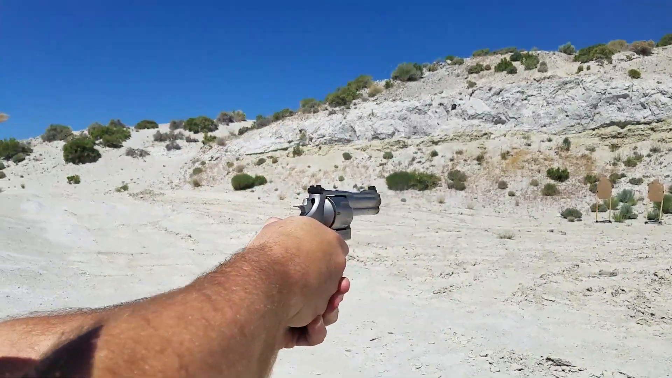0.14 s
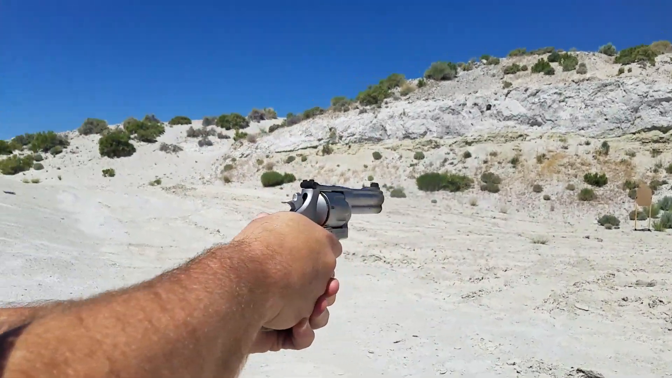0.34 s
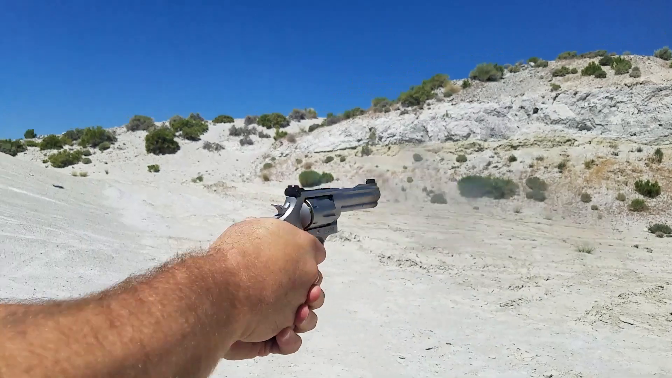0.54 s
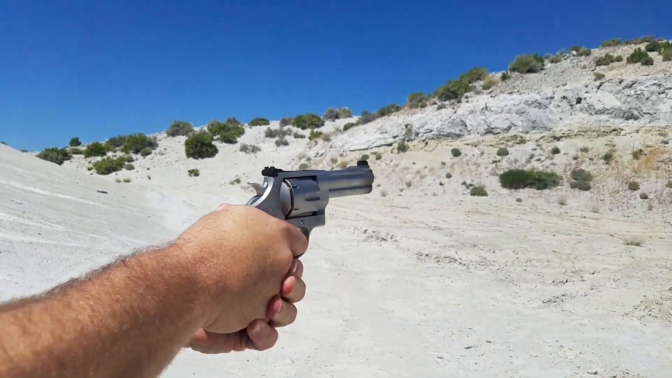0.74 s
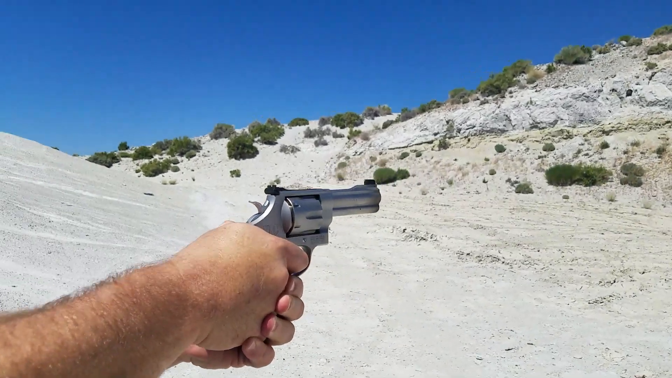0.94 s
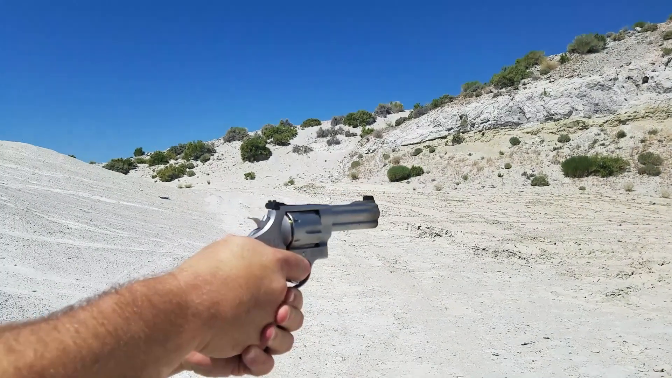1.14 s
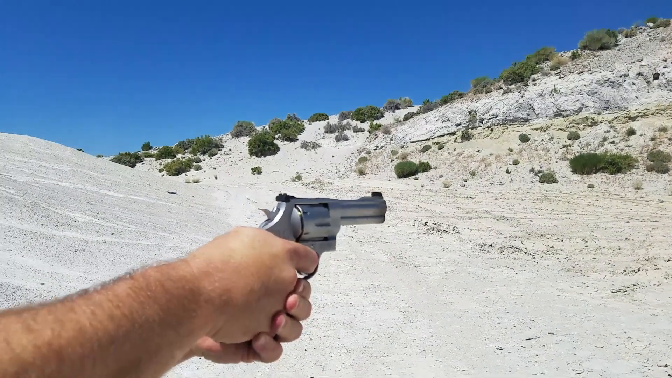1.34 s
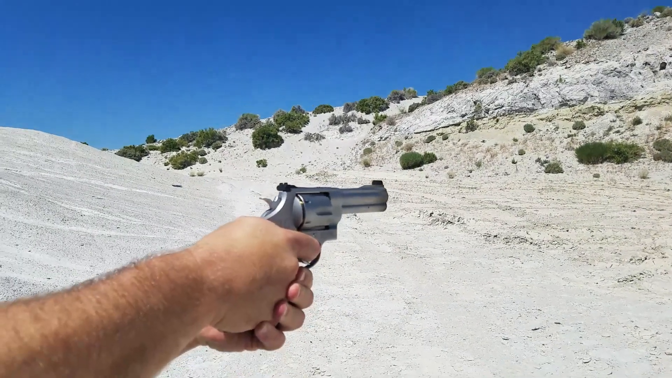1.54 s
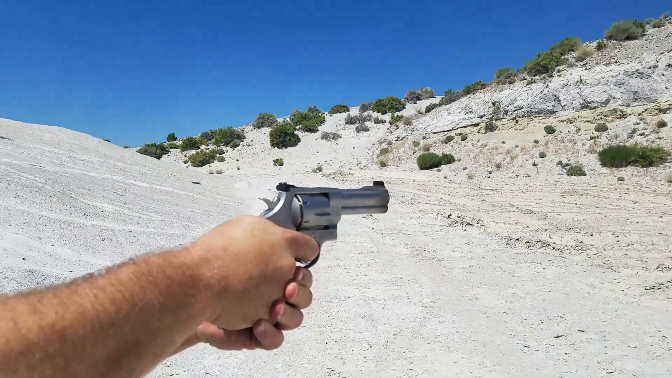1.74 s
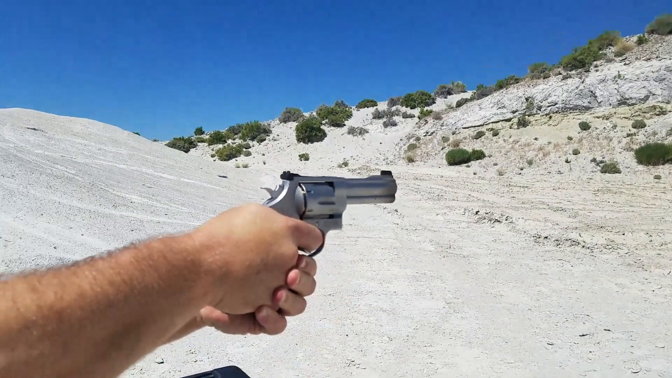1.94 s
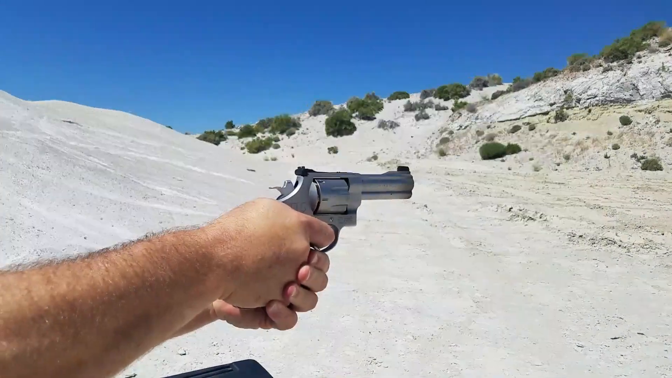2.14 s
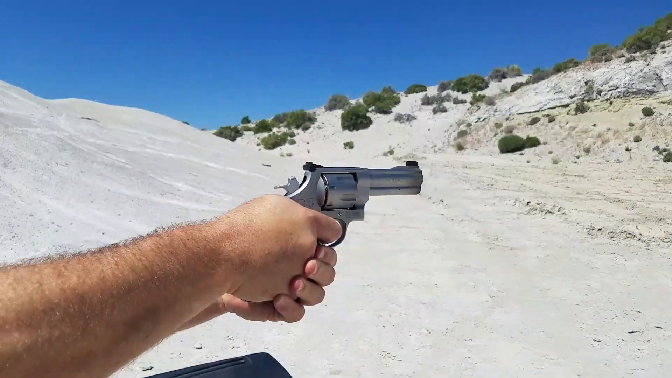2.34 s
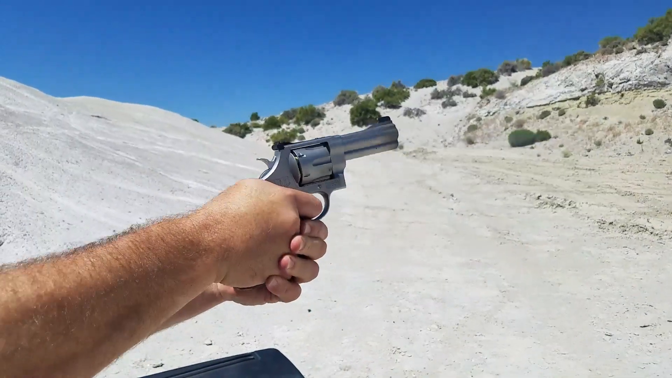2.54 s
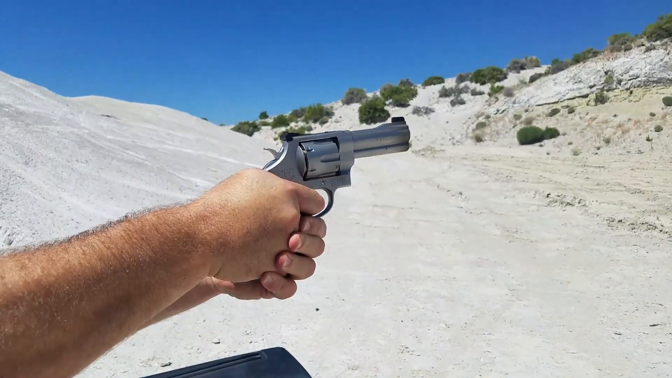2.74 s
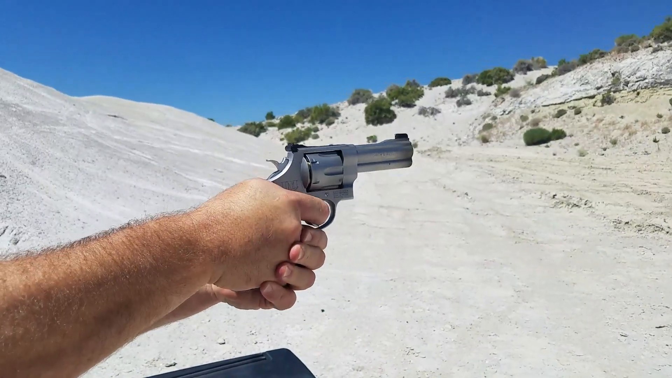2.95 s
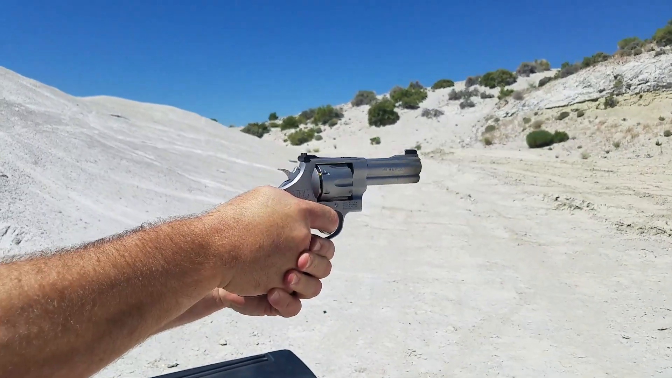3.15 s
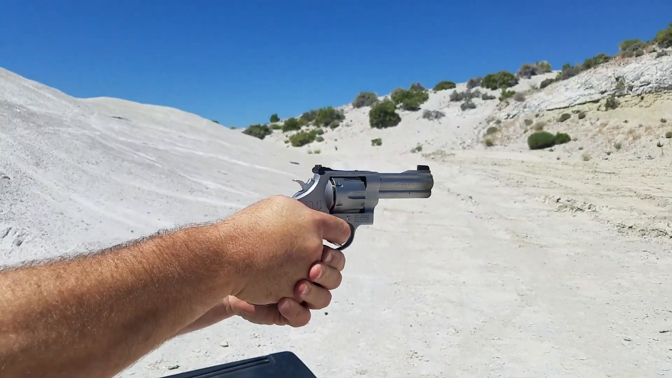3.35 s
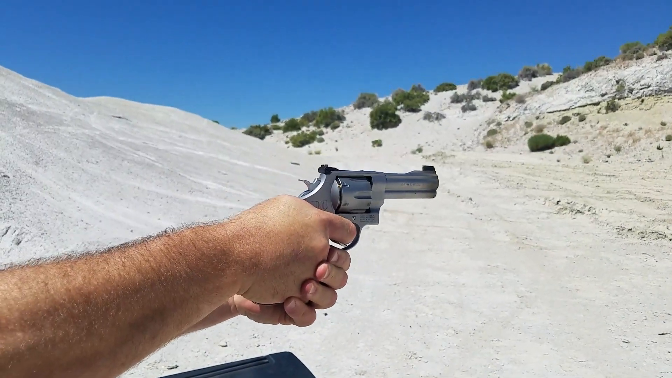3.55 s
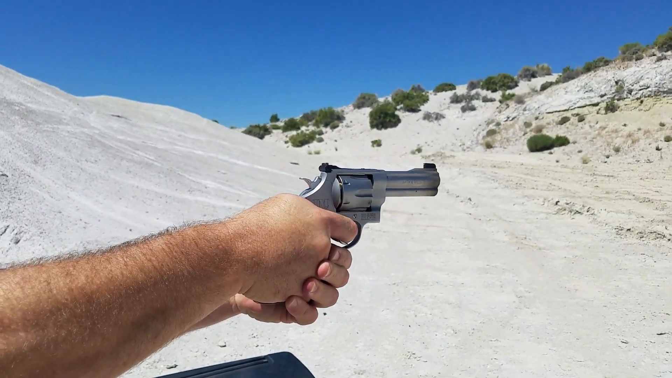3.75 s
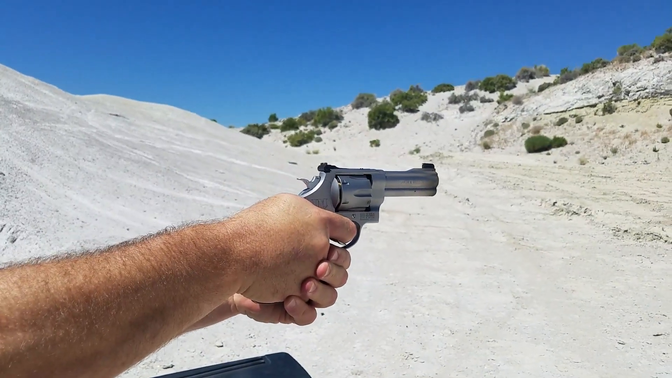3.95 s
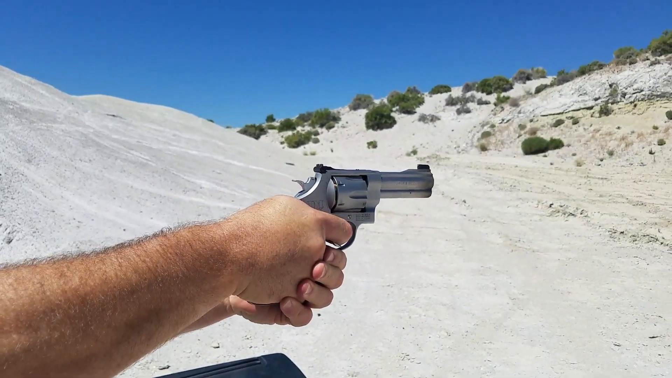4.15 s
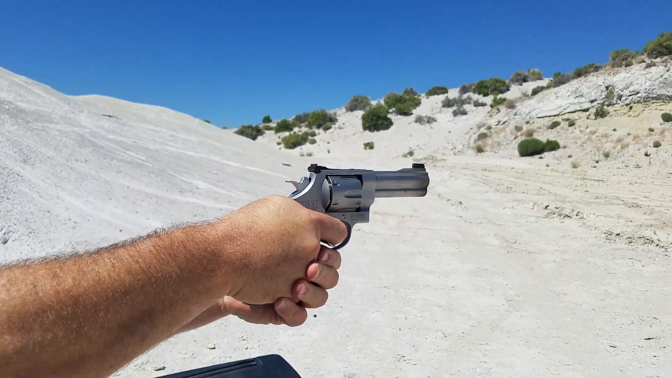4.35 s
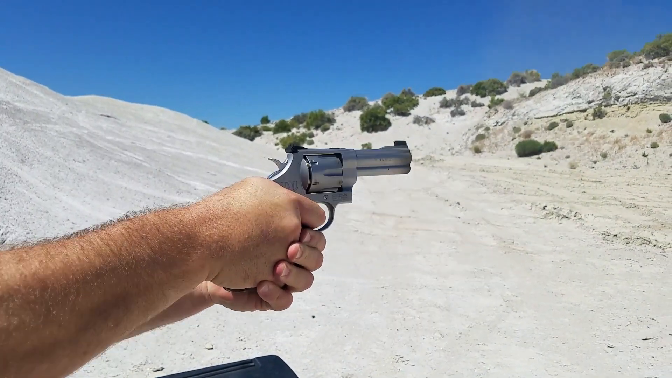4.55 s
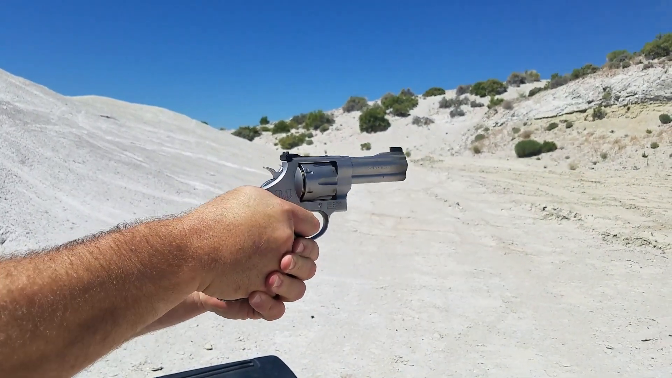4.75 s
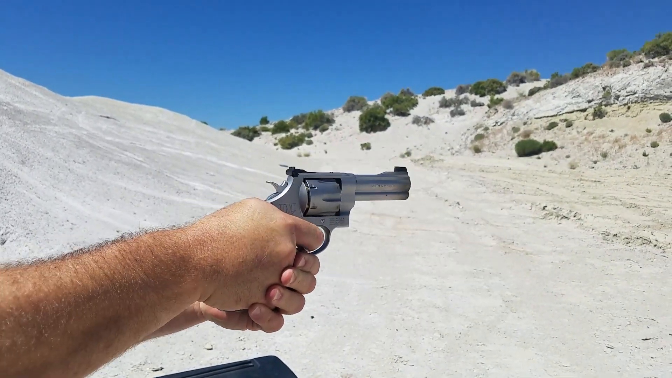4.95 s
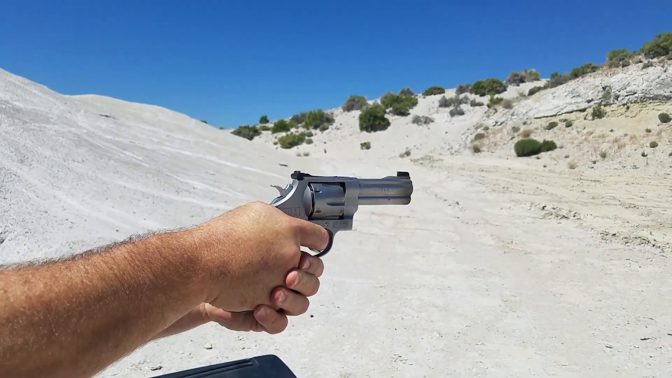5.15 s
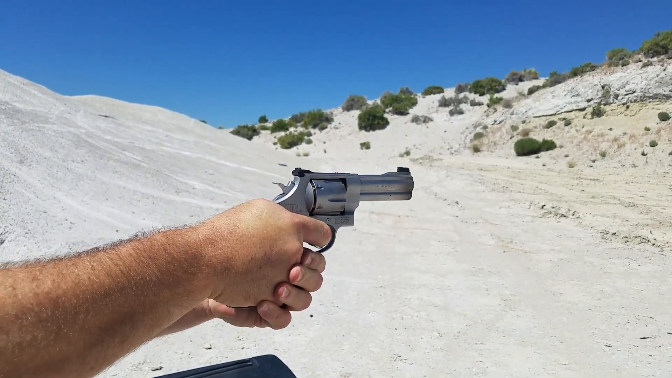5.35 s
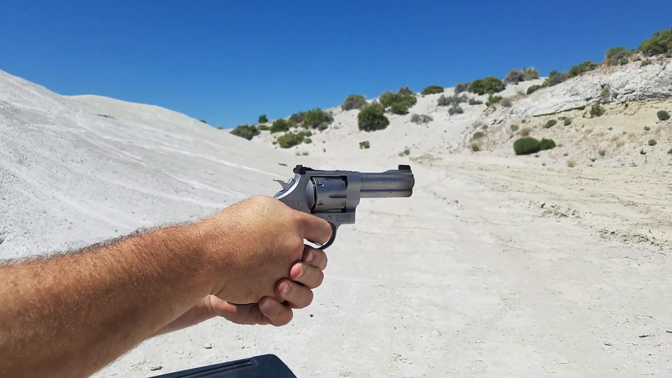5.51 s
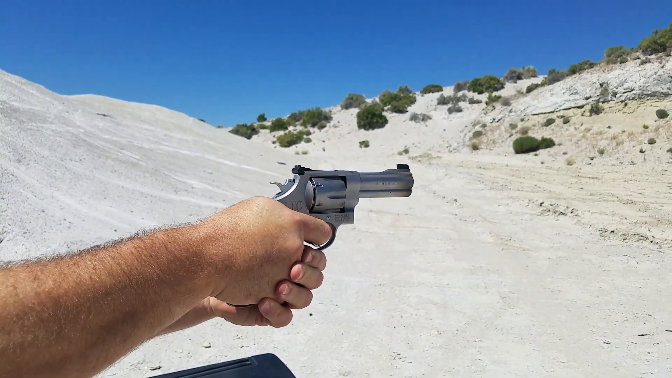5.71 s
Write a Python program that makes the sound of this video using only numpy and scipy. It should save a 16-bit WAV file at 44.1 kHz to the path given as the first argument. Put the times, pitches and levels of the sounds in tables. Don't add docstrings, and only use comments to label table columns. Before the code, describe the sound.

A steel click and lumpy wind open the scene, then a loud revolver shot with a quick double echo and rumbling decay. Two more follow, slowly spaced, the last with the strongest crack. The quiet surroundings sink after each shot and creep back: gusts striking left and right unequally, distant air, very faint pulsing insects, small lock clicks. Close stereo microphone in an open basin.

```python
import sys
import numpy as np
from scipy import signal
from scipy.fft import rfft, irfft, next_fast_len
from scipy.io import wavfile
from scipy.ndimage import uniform_filter1d, map_coordinates

SR = 44100
rng = np.random.default_rng(int(sys.argv[2]) if len(sys.argv) > 2 else 0)


def convert_level_to_amplitude(level_db):
    exponent = np.asarray(level_db, float) / 20
    return 10 ** exponent


def master_out(mix):
    frames = np.transpose(np.atleast_2d(mix))
    ceiling = np.clip(frames, -1, 1)
    pcm = np.round(ceiling * 32767).astype(np.int16)
    wavfile.write(sys.argv[1], SR, pcm)


N = 254898


def unit(x):
    return x / np.sqrt(np.mean(x ** 2) + 1e-20)


def noise(*shape):
    return rng.standard_normal(shape)


def along(points, hz):
    f, v = np.transpose(points)
    return np.interp(np.log(hz + 1), np.log(f + 1), v)


def wobble(knots_per_s):
    knots = noise(int(N * knots_per_s / SR) + 4)
    return map_coordinates(knots, [np.arange(N) * knots_per_s / SR])


def filtered(x, response):
    size = next_fast_len(x.shape[-1] + 4096)
    gain = response(np.fft.rfftfreq(size, 1 / SR))
    gain = gain / np.sqrt(np.mean(abs(gain) ** 2))
    return irfft(rfft(x, size) * gain, size)[..., :x.shape[-1]]


def coloured(x, spectrum):
    points = [(1, -120)] + spectrum + [(SR, -90)]
    return filtered(x, lambda hz: convert_level_to_amplitude(along(points, hz)))


def resonances(modes):
    def response(f):
        total = 0
        for k, (centre, width, db) in enumerate(modes):
            damping = 1j * f * width
            total = total + (-1) ** k * convert_level_to_amplitude(db) * damping / (centre * centre - f * f + damping)
        return total
    return response


def swell(t, rise_s, t60_s):
    t = np.maximum(t, 0)
    return (1 - np.exp(-t / rise_s)) * convert_level_to_amplitude(-60 * t / t60_s)


def pan(db):
    return db * np.array([[.5], [-.5]])


def add(out, sound, s):
    part = out[:, round(s * SR):][:, :sound.shape[1]]
    part += sound[:, :part.shape[1]]


# (frequency [Hz], left-right likeness [0-1])
PORT_LIKENESS = [(60, 0.24), (130, .94), (380, .92), (700, 0.25), (1200, 0.97), (2400, 0.63), (6000, .5),
                 (15000, .55)]
# (frequency [Hz], left lead [rad])
PORT_LEAD = [(20, 0), (300, -0.5), (600, -0.46), (1400, -2), (2400, -1.5), (4000, -1.8), (15000, -1.5)]
# (frequency [Hz], left minus right [dB])
PORT_LEAN = [(60, -1.0), (180, -2.5), (550, -1), (1650, -2), (4970, -3.5), (15000, 1.5)]


def ports(pair):
    size = pair.shape[1] + 512
    hz = np.fft.rfftfreq(size, 1 / SR)
    turn = np.arccos(np.clip(along(PORT_LIKENESS, hz), 0, 1)) / 2
    mid, side = rfft(pair, size) * [np.cos(turn), np.sin(turn)]
    skew = convert_level_to_amplitude(along(PORT_LEAN, hz) / 2) * np.exp(.5j * along(PORT_LEAD, hz))
    return irfft([(mid + side) * skew, (mid - side) / skew], size)[:, :pair.shape[1]]


# (loud body onset [s], muzzle crack [dB], answer [dB], boom pitch [Hz], gain control dip [dB])
SHOTS = [
    (0.5425, -19, 3.5, 491.3, 10),
    (2.4950, -18, 4.5, 549.6, 8),
    (4.4098, 0, 2.5, 530, 12),
]
# (centre [Hz], width [Hz], level [dB])
FRAME_MODES = [(700, 1200, -10), (2100, 310, 3), (3600, 1400, -1.5), (6000, 2600, -5.5),
               (12000, 6000, -9.5)]
# (centre [Hz], width [Hz], level [dB])
GAS_MODES = [(485, 96, 2.5), (1800, 1500, -1.5), (5800, 3000, -9.5), (13363, 17000, -9.5)]
HAMMER_DB = -17.5


def shots():
    lead_in_s = .04
    out, t = np.zeros((2, N)), np.arange(SR) / SR - lead_in_s
    ground = noise(3, 2, SR)
    boulders = convert_level_to_amplitude(1.2 * wobble(77)[:SR])
    for s, crack_db, answer_db, boom_hz, _ in SHOTS:
        fresh = noise(5, 2, SR)
        facets = np.cos(.7) * ground + np.sin(.7) * fresh[:3]
        sound = convert_level_to_amplitude(answer_db) * terrain(t, boulders * facets, boom_hz)
        blow = swell(t + .0205, .0001, .03) + 4 * swell(t + .0205, .0001, .003)
        sound += convert_level_to_amplitude(crack_db + HAMMER_DB) * ports(filtered(blow * fresh[3], resonances(FRAME_MODES)))
        held = swell(t + .0115, 0.00012, 0.099) * (t < .001)
        sound += convert_level_to_amplitude(crack_db) * ports(filtered(held * fresh[4], resonances(GAS_MODES)))
        add(out, sound, s - lead_in_s)
    return out


def clumped(pair, chance, depth_db):
    z = signal.stft(pair, nperseg=128)[2]
    field = chance[:z[0].size].reshape(z[0].shape)
    field = uniform_filter1d(field, size=2, axis=0)
    field = uniform_filter1d(field, size=6, axis=1)
    return signal.istft(z * convert_level_to_amplitude(depth_db * unit(field)), nperseg=128)[1][:, :pair.shape[1]]


# (delay [s], rise [s], t60 [s], boom [dB], middle over boom [dB])
SLOPES = [(-.001, 0.0017, 0.18, -8.5, 0), (.002, 0.0033, .07, -3.5, -13.5), (.02, .01, 0.18, -22, 0.5),
          (.036, .006, 0.1, -8.5, -17), (0.06, .01, .5, -30, -2), (.111, .002, .07, -16, -8),
          (.12, 0.0022, 0.19, -22, -4.5), (0.155, .004, .06, -21, -8), (.166, 0.003, 0.06, -12, -8.5),
          (0.173, 0.0036, .06, -5.5, -13.5), (.191, .003, 0.05, -15, -11), (.203, .003, 0.05, -13.5, -14),
          (.217, .004, .07, -19.5, -17), (.245, .02, 0.19, -35, -12), (0.302, 0.011, 0.46, -47, -10),
          (0.347, 0.016, 0.175, -47, -3.5), (.39, 0.025, .3, -61, -3.5), (0.432, .01, 0.2, -51.5, -7),
          (.5, 0.057, 0.66, -58.5, -12), (0.602, 0.025, 0.19, -54, -17)]
# (centre [Hz], 1 = boom pitch; width [Hz], level [dB])
BOOM_LOBES = [(225, 85, -12), (344, 130, -7.5), (1, 174, -0.5), (706, 314, -7)]
# (frequency [Hz], level [dB])
DEEP = [(15, -13), (35, -5), (65, -0.5), (110, -6), (160, -23.5), (300, -69)]
# (frequency [Hz], level [dB])
NEAR_MIDDLE = [(500, -35), (900, 0.5), (1500, 0), (2200, -8), (3000, -8), (4200, -13.5), (6000, -22.5),
               (9000, -38.5)]
# (frequency [Hz], level [dB])
FAR_MIDDLE = [(450, -27), (800, 3), (1000, 0), (1400, -7.5), (2500, -9.5), (3500, -17), (5000, -27)]
# (frequency [Hz], level [dB])
TOP = [(2500, -27), (5000, -0.5), (8000, -2), (10500, -3.5), (13000, 0.5), (15800, -1)]
TOP_DB, EARLY_SCATTER_DB = -12, -1.2
AIR_DB_PER_S, SCRUB_DB_PER_S2 = 20, 680


def terrain(t, facets, boom_hz):
    boom_power, middle_power, top_power = 0, 0, 0
    for s, rise_s, t60_s, db, mid_db in SLOPES:
        top_db = db + mid_db + TOP_DB - AIR_DB_PER_S * s - SCRUB_DB_PER_S2 * s * s
        short_tail = swell(t - s, rise_s, t60_s * 0.8)
        boom_power = boom_power + (convert_level_to_amplitude(db) * short_tail) ** 2
        middle_power = middle_power + (convert_level_to_amplitude(db + mid_db) * swell(t - s, rise_s, t60_s * 0.87)) ** 2
        top_power = top_power + (convert_level_to_amplitude(top_db) * short_tail) ** 2
    boom, middle, top = np.sqrt([boom_power, middle_power, top_power])

    lobes = resonances([(boom_hz if hz == 1 else hz, w, db) for hz, w, db in BOOM_LOBES])
    full_blast = filtered(facets[0], lambda f: lobes(f) * (1j * f / (105 + 1j * f)) ** 2)
    main_lobe = filtered(facets[0], resonances([(526, 57, 0)]))
    narrow = np.clip((t - .45) / 0.11, 0, 1)
    wave = (1 - narrow) * full_blast + narrow * main_lobe
    wave /= np.sqrt(abs(uniform_filter1d(wave ** 2, size=500)) + 0.21)

    rumble = convert_level_to_amplitude(-46.0) * coloured(swell(t, 0.017, 0.87) * facets[0, ::-1, ::-1], DEEP)
    near = convert_level_to_amplitude(EARLY_SCATTER_DB * convert_level_to_amplitude(-60 * np.maximum(t, 0) / 0.36))
    far = np.clip((t - .2) / .15, 0, 1) * np.pi / 2
    scatter = coloured(middle * near * np.cos(far) * facets[1], NEAR_MIDDLE)
    scatter = scatter + coloured(middle * np.sin(far) * facets[1], FAR_MIDDLE)
    scatter = clumped(scatter, facets[2].ravel()[::-1], depth_db=1.0)
    treble = coloured(top * near * facets[2], TOP)
    return ports(boom * wave + rumble + scatter + treble)


# (delay [s], peak [dB], centre [Hz], left minus right [dB], grit [dB])
FACES = [
    (0.1123, -9.5, 2302, -5, -17),
    (0.1339, -10, 3200, -4, -10),
]
PATH_RATIO = [1.012, .997, .999]
# (frequency [Hz], level [dB])
GRIT = [(1500, -12.5), (3000, 2.5), (9000, -0.5), (15000, -11)]


def faces():
    out, t = np.zeros((2, N)), np.arange(SR // 20) / SR
    for shot, ratio in zip(SHOTS, PATH_RATIO):
        for delay_s, db, hz, pan_db, grit_db in FACES:
            u = (t - np.array([[.0005], [.0003]])) * hz * 3.5
            dip = (u * u - 1) * np.exp(-u * u / 2)
            grit = convert_level_to_amplitude(grit_db) * coloured(swell(t - .0004, .0001, .007) * noise(2, len(t)), GRIT)
            add(out, convert_level_to_amplitude(db + 2.5 + pan(pan_db)) * (dip + grit), shot[0] + ratio * delay_s)
    return out


# (time [s], peak [dB], low part [dB], left minus right [dB], frame ring
# [dB])
TICKS = [(0.093, -29.5, -9.5, -2.5, -6), (1.1018, -37.5, -8, -4, -3), (1.1114, -45.5, -13, 6, 3),
         (1.6444, -54, -8, 0.5, 2), (1.6564, -57.5, -7, -1.5, -2), (2.144, -29, -10.5, -1.5, -6),
         (2.9479, -33, -7, -0.5, -0.5), (3.4194, -54, -2.5, -3, -8), (4.9932, -43, -10, -6, 0),
         (4.9965, -36, -11.5, 1.5, -2), (5.3844, -55, -3, 0, -6),
         (4.3644, -43.5, 9, 0, 17.5),
    (4.3725, -28, -3.5, -2, -6),
]
# (centre [Hz], width [Hz], level [dB])
STEEL_MODES = [(1400, 780, -9.5), (2270, 470, -0.5), (3300, 577, 1), (6400, 1100, -8.5), (9800, 3400, -7.5),
               (12760, 510, 3), (14500, 2000, -7)]
TICK_T60_S = 0.019


def lock():
    out, t = np.zeros((2, N)), np.arange(SR // 10) / SR
    for s, db, low_db, pan_db, frame_db in TICKS:
        parts = []
        for hz, width, level in STEEL_MODES:
            level = level + (low_db + 10) * (hz < 5000) + frame_db * (hz < 2600)
            parts.append((hz, width, level))
        burst = filtered(swell(t, 0.00025, TICK_T60_S) * noise(2, len(t)), resonances(parts))
        add(out, convert_level_to_amplitude(db - 3.5 + pan(pan_db)) * ports(burst), s)
    return out


# (time [s], half length [s], level [dB], centre [Hz])
SCUFFS = [
    (0.318, 0.04, -59.5, 1150),
    (1.655, 0.013, -58, 654),
    (2.099, 0.017, -71.5, 1950),
    (2.329, .006, -68.5, 1960),
]


def scuffs():
    out, t = np.zeros((2, N)), np.arange(-SR // 10, SR // 10) / SR
    for s, half_s, db, hz in SCUFFS:
        rub = np.exp(-(t / half_s) ** 2) * noise(2, len(t)) * convert_level_to_amplitude(5.9 * noise(len(t)))
        band = resonances([(hz, 1.2 * hz, 0)])
        add(out, convert_level_to_amplitude(db) * ports(filtered(rub, lambda f: band(f) ** 2)), s + t[0])
    return out


# (start [s], hold [s], windward port [dB], left minus right [dB], flutter over thud [dB])
GUSTS = [(-.03, 0.021, -44, -16, 1), (.04, 0.032, -44.5, 19, -3.5), (.26, 0.058, -45, -11, 2),
         (.38, 0.082, -52, 22, 5), (0.857, 0.16, -47, 3, -3.5), (1.12, .1, -56.5, -19, -1),
         (1.7, 0.022, -58, -10, -9.5), (1.9, .03, -59.5, -13, -7), (2.02, .05, -68, -3, 4),
         (2.11, 0.033, -58.5, 2.5, -8), (2.24, .05, -62, 4.5, -0.5), (2.35, 0.14, -59.5, -3, 4.5),
         (3.23, 0.044, -58.5, 4, -8.5), (3.41, 0.075, -56.5, -14.5, 3.5), (3.53, .03, -40, 4, -2.5),
         (3.58, 0.075, -51, 0, -4), (3.69, 0.091, -50.5, -10.5, -2), (4.01, 0.14, -63, -12, 6.5),
         (4.11, .04, -57, 2.5, -11), (5.03, .03, -58, -7, -7), (4.95, .04, -59, -2, -2),
         (5.17, .05, -58.5, 1, 0.5), (5.25, .13, -52.5, 3.5, -4.5), (5.55, 0.15, -63.5, -18, -.5),
         (5.69, 0.037, -55, -18, -11.5)]
# (frequency [Hz], level [dB])
FLUTTER = [(70, -23), (120, -1), (250, -6.5), (400, -12), (550, -23), (900, -70.5)]
GUST_RISE_S, GUST_T60_S = 0.0074, 0.53
BREEZE_DB, FLUTTER_DB = -68, -70


def wind():
    t = np.arange(N) / SR
    deep_power, upper_power = convert_level_to_amplitude(2 * BREEZE_DB), convert_level_to_amplitude(2 * FLUTTER_DB)
    for s, hold_s, db, pan_db, flutter_db in GUSTS:
        rise = 1 - np.exp(-np.maximum(t - s, 0) / GUST_RISE_S)
        shape = rise * convert_level_to_amplitude(-60 * np.maximum(t - s - hold_s, 0) / GUST_T60_S)
        power = (convert_level_to_amplitude(db + np.minimum(0, [[pan_db], [-pan_db]])) * shape) ** 2
        deep_power = deep_power + power
        upper_power = upper_power + convert_level_to_amplitude(2 * flutter_db) * power
    eddies = np.array([wobble(24), wobble(22)])

    def lumps(depth_db):
        fine = np.array([wobble(45), wobble(44)])
        return convert_level_to_amplitude(depth_db * np.tanh(0.72 * eddies + 0.44 * fine))

    deep = unit(lumps(8) * coloured(noise(2, N), DEEP))
    upper = unit(lumps(7.1) * coloured(noise(2, N), FLUTTER))
    return np.sqrt(deep_power) * deep + np.sqrt(upper_power) * upper


# (frequency [Hz], level [dB])
DISTANT = [(250, -20), (450, -0.5), (1000, -5), (2000, -7), (3500, -13), (5000, -18.5), (7000, -30.5)]
# (frequency [Hz], level [dB])
HISS = [(3000, -11.5), (5000, -7), (7000, -4.5), (9000, -3.5), (11000, -3), (13500, 0.5), (15800, 0.5)]
AIR_DB, AIR_EASES_DB_PER_S = -67, 0.59
HISS_DB, HISS_EASES_DB_PER_S = -74, 0.41
INSECT_DB, INSECT_PULSE_HZ = -84, 9.7


def background():
    t = np.arange(N) / SR
    air = convert_level_to_amplitude(AIR_DB - AIR_EASES_DB_PER_S * t + 1.2 * wobble(11)) * coloured(noise(2, N), DISTANT)
    hiss = convert_level_to_amplitude(HISS_DB - HISS_EASES_DB_PER_S * t) * coloured(noise(2, N), HISS)
    pulse = np.maximum(np.sin(2 * np.pi * INSECT_PULSE_HZ * t + .4), 0) * convert_level_to_amplitude(2.5 * wobble(2.5))
    chirr = filtered(noise(2, N), resonances([(9000, 900, 0)]))
    return air + hiss + convert_level_to_amplitude(INSECT_DB) * pulse * chirr


HELD_S, RECOVER_S = .6, .27


def gain_control():
    t = np.arange(N) / SR
    gain_db = np.zeros(N)
    for s, *_, dip_db in SHOTS:
        gain_db -= dip_db * (t > s) * np.exp(-np.maximum(t - s - HELD_S, 0) / RECOVER_S)
    return gain_db


def scene():
    surroundings = wind() + background()
    return shots() + faces() + lock() + scuffs() + convert_level_to_amplitude(gain_control()) * surroundings


# (frequency [Hz], level [dB])
BAND_EDGE = [(15650, 0), (15850, -8), (16350, -32.5)]


def band_limit(x):
    return signal.sosfilt(signal.butter(12, 16400, fs=SR, output="sos"), x)


def record(dry):
    clipped = dry / (1 + abs(dry / 1.03) ** 16) ** (1 / 16)
    size = next_fast_len(N)
    hz = np.fft.rfftfreq(size, 1 / SR)
    gain = convert_level_to_amplitude(along(BAND_EDGE, hz)) * hz / np.hypot(hz, 25)
    mix = irfft(rfft(clipped, size) * gain, size)[:, :N]
    return band_limit(mix)


dry = scene()
out = record(dry)
master_out(out)
```